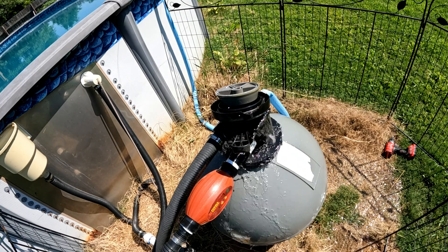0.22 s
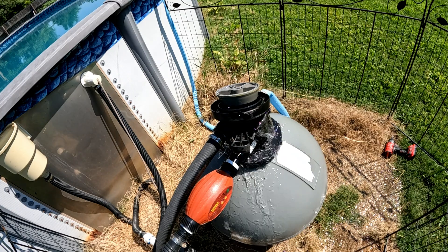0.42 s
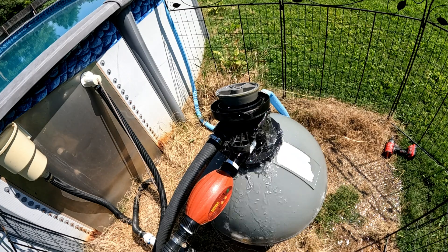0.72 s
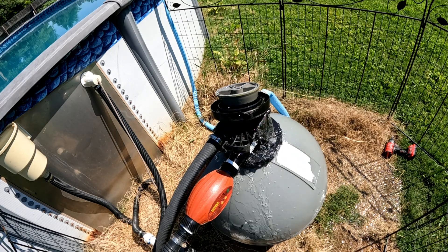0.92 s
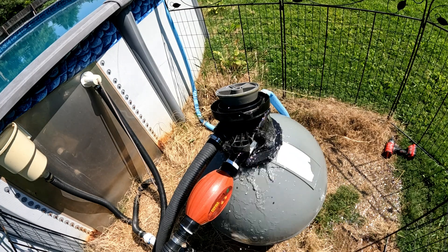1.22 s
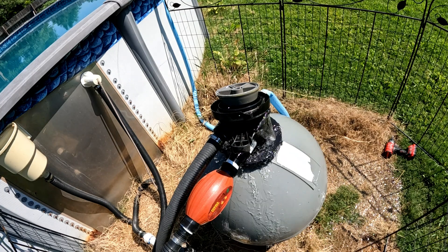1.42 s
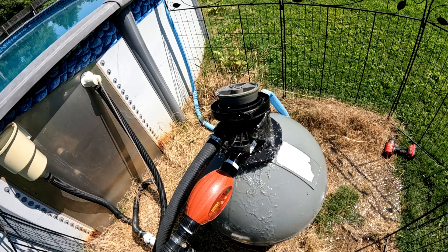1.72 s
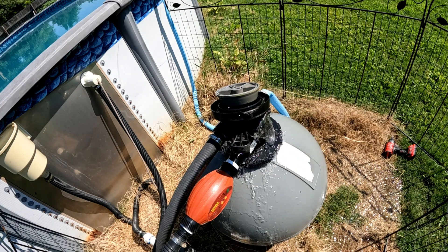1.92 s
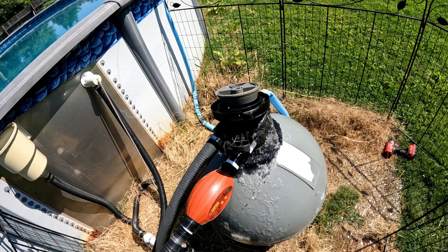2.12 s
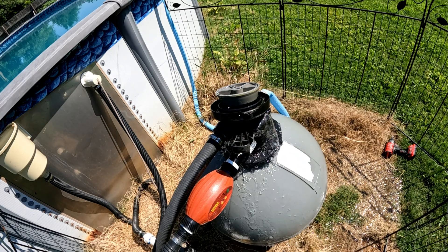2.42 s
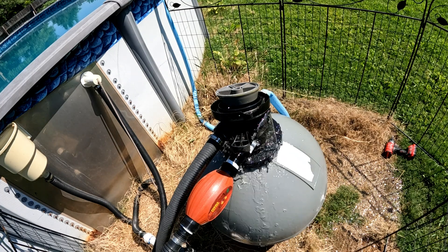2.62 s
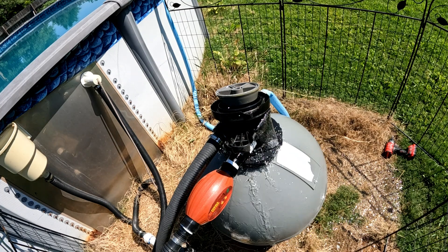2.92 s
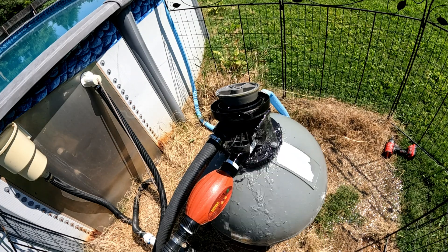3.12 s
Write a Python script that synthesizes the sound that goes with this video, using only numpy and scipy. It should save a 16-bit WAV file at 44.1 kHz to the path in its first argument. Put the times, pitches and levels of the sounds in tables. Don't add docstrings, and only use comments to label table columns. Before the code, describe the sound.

Water trickling and fizzing down a plastic tank outdoors, with plinking drops and two low wind gusts

```python
import sys
import numpy as np
from scipy import signal
from scipy.fft import rfft, irfft
from scipy.io import wavfile
from scipy.ndimage import uniform_filter1d

SR = 44100
rng = np.random.default_rng(int(sys.argv[2]) if len(sys.argv) > 2 else 0)


def unload_audio(sound):
    columns = np.transpose(np.atleast_2d(sound))
    steps = np.round(np.clip(columns, -1, 1) * 32767)
    wavfile.write(sys.argv[1], SR, steps.astype(np.int16))


def level_to_linear(level):
    exponent = np.asarray(level, float) / 20
    return 10 ** exponent


N = 143325

# [t/s, level/dB]
WATER_FLOW = [(0, -38), (.24, -38), (.42, -39.5), (.7, -37), (1.32, -39), (1.62, -39.5), (1.7, -37),
              (2.4, -39), (2.65, -40), (2.8, -34.5), (2.88, -38.5), (3.25, -38.5)]
# [f/Hz, level per Hz/dB]
WASH_COLOUR = [(150, -8.5), (300, -13.5), (670, -15), (1030, -3.5), (2880, 0), (6500, -9), (10400, -15),
               (15000, -25.5)]
# [f/Hz, level per Hz/dB]
TRICKLE_COLOUR = [(400, -38), (1020, -6.5), (1250, -2), (2500, -1), (4700, -7.5), (6800, -9), (10000, -18),
                  (15600, -41)]
# [t/s, level/dB]
GUST_LEVEL = [(0, -50.5), (.36, -39), (.46, -33), (.72, -30.5), (.8, -23.5), (1.02, -28.5), (1.07, -34),
              (1.3, -40), (1.5, -42.5), (1.63, -43.5), (1.85, -39.5), (2.0, -29), (2.4, -30), (2.65, -36.5),
              (2.8, -49), (3.25, -43)]
# [f/Hz, level per Hz/dB]
WIND_COLOUR = [(10, -2.5), (25, 5), (45, -3.5), (120, -19), (200, -29), (400, -52)]
# [t/s, peak level/dB, f/Hz]
WALL_SPATTERS = [(0.0313, -24, 1900), (0.2202, -22, 1370), (0.3406, -29.5, 1430), (0.377, -27, 2830),
                 (0.4945, -30.5, 930), (0.5763, -20.5, 1710), (0.6437, -25, 2760), (0.6721, -24.5, 930),
                 (0.911, -34, 2700), (1.0276, -23, 3470), (1.277, -34, 2790), (1.3274, -23, 4940),
                 (1.394, -22.5, 2440), (1.4262, -26, 1195), (1.4612, -25, 3130), (1.5821, -23.5, 1240),
                 (1.7072, -22.5, 4770), (1.8372, -25, 6100), (1.8538, -22, 2450), (2.0144, -25, 1730),
                 (2.1172, -19, 2130), (2.2837, -24, 2570), (2.358, -27, 4280), (2.3815, -24, 3960),
                 (2.4518, -29.5, 1190), (2.517, -23, 2200), (2.5306, -25, 2130), (2.6065, -25, 2400),
                 (2.676, -24, 2240), (2.699, -23.5, 2300), (2.7903, -17.5, 2380), (2.8153, -20.5, 1510),
                 (2.8856, -32, 2530), (3.1345, -27, 2890)]
# [t/s, peak level/dB]
SPRAY_TICKS = [(0.0797, -33), (0.1391, -41), (0.2773, -26), (0.376, -36), (0.445, -29), (0.5247, -36),
               (0.6933, -32), (0.9293, -41), (1.044, -39), (1.6676, -28), (1.748, -29), (1.7734, -40),
               (1.8018, -36), (2.0403, -39), (2.2179, -34), (2.2732, -34), (2.3156, -26), (2.4154, -25),
               (2.5476, -37), (2.7611, -37), (2.836, -33)]
# [t/s, peak level/dB, bubble f/Hz]
LARGE_DROPS = [(0.0828, -23.5, 3840), (0.1057, -22.5, 2670), (0.152, -25.5, 3200), (0.1948, -31, 1550),
               (0.221, -36, 1330), (0.2448, -18, 3870), (0.4542, -24.5, 2520), (0.7786, -20.5, 3060),
               (0.9336, -24, 2700), (0.963, -27, 2040), (1.0947, -22.5, 4600), (1.1178, -22.5, 4500),
               (1.3638, -31, 2240), (1.4148, -21.5, 2390), (1.5502, -23.5, 2216), (1.6663, -22.5, 2930),
               (1.68, -22, 1830), (1.753, -28, 2640), (1.785, -25.5, 2440), (1.9885, -27.5, 2160),
               (2.227, -28, 2210), (2.4165, -19, 2970), (2.7533, -22, 2840), (2.9143, -27, 3100),
               (2.9547, -25, 3260), (2.995, -26, 4230)]
# [t/s, peak level/dB, f/Hz, time to fall 60 dB/s, pitch rise/ratio]
DEEP_GURGLES = [
    (.212, -37, 690, 0.03, 0.58),
    (.309, -32, 657, 0.04, 0.24),
    (2.892, -38.5, 683, 0.14, 2.1),
    (3.087, -23, 1620, 0.024, 0.039),
    (3.177, -35.5, 1564, 0.089, 0.018),
    (3.225, -21, 1430, 0.023, .2),
]
# [t/s, peak level/dB, f/Hz]
BRIGHT_TICKS = [(0.2778, -26.5, 6600), (0.56, -22, 7680), (0.665, -26.5, 5130), (0.9502, -23.5, 6600),
                (1.668, -20.5, 6300), (1.9932, -20.5, 7330), (2.4162, -10.5, 5960), (2.7357, -16, 5700),
                (3.133, -24.5, 6050), (3.2096, -24, 7450)]
# [t/s, peak level/dB, f/Hz]
WIND_BUFFETS = [(0.457, -22, 57), (0.546, -23, 73), (0.61, -20, 88), (0.648, -20.5, 96),
                (0.678, -17.5, 91.5), (0.755, -18.5, 83), (0.791, -15.5, 60), (0.812, -18.5, 80),
                (0.83, -16, 100), (0.93, -16, 78.5), (0.977, -17.5, 57), (0.998, -13.5, 51),
                (2.014, -22.5, 65.6), (2.09, -17, 71), (2.16, -22, 118), (2.193, -19, 186),
                (2.237, -21.5, 124), (2.292, -17.5, 118), (2.337, -20, 139), (2.366, -19, 85),
                (2.39, -19.5, 112), (2.415, -14.5, 95)]
# [t/s, peak level/dB, f/Hz]
WIND_FLAPS = [(.664, -18.5, 204), (1.07, -32.5, 50), (1.15, -31.5, 55.6), (1.199, -33.5, 50),
              (1.259, -34, 45), (1.429, -31, 45), (1.478, -33, 45), (1.531, -33, 45), (1.989, -21, 49.4),
              (2.071, -22, 70), (2.446, -25.5, 70), (2.52, -30, 45), (2.63, -27.5, 59.7)]
# [t/s, length/s, level/dB]
AIR_RUSHES = [
    (0.484, 0.29, -47),
    (1.097, 0.095, -56.5),
    (2.15, 0.12, -44),
    (2.678, 0.4, -54),
]
# [t/s, length/s, peak level/dB, start f/Hz, end f/Hz]
GASKET_SQUEAKS = [
    (0.504, 0.042, -32, 972, 943),
    (0.539, 0.038, -40, 945, 798),
    (0.577, 0.029, -33, 881, 900),
    (0.683, 0.024, -22, 811, 946),
]
# [t/s, length/s, peak level/dB, f/Hz]
HOSE_GROANS = [
    (1.12, 0.11, -48.5, 200),
    (2.456, 0.165, -48, 200),
]
# [f/Hz, phase/rad]
PORT_LEAD = [(200, -0.17), (3400, -0.57), (6000, -0.38), (8400, -0.76), (11000, 0.11)]
# [f/Hz, level/dB]
PORT_TILT = [(400, 0), (2400, -1), (8000, 1), (15000, 4)]
# [f/Hz, likeness/0 to 1]
PORT_LIKENESS = [(300, 0.86), (700, 0.87), (1400, 0.96), (6800, 0.89), (10000, 0.89), (13000, 0.45)]


def evened(x):
    return x / np.sqrt(np.mean(x ** 2) + 1e-20)


def read(points, hz):
    f, value = np.transpose(points)
    return np.interp(np.log(hz + 1), np.log(f + 1), value)


def curve(table, t):
    times, levels = np.transpose(table)
    return np.interp(t, times, levels)


def add(mix, s, sound):
    part = mix[max(round(s * SR), 0):][:len(sound)]
    part += sound[:len(part)]


def drift(size, count):
    smooth = uniform_filter1d(rng.standard_normal(size), count)
    return evened(uniform_filter1d(smooth, count))


def shaped(x, gain):
    size = 2 ** 18
    return irfft(rfft(x, size) * gain(np.fft.rfftfreq(size, 1 / SR)))[..., :N]


def bubble(hz, t60, glide, rise_s):
    t = np.arange(0, max(t60, .002), 1 / SR)
    level = (1 - np.exp(-t / rise_s)) ** 2 * level_to_linear(-60 * t / t60)
    return level * np.sin(2 * np.pi * hz * t * (1 + glide * (t / t60) ** 1.57))


def splash(hz, t60):
    t = np.arange(2048) / SR
    b, a = signal.butter(2, [hz * .75, min(hz * 1.4, 18000)], "band", fs=SR)
    noise = evened(signal.lfilter(b, a, rng.standard_normal(2048)))
    return noise * level_to_linear(-60 * t / t60) * np.minimum(t / 0.0004, 1)


def wash():
    frames = N // 64 + 5
    *z, patches = rng.standard_normal((frames, 129, 5)).T
    patches = uniform_filter1d(patches, size=4, axis=0)
    patches = evened(uniform_filter1d(patches, size=20, axis=1))
    z = np.array(z[:2]) + 1j * np.array(z[2:])
    z = z * level_to_linear(3 * patches + 2 * drift(frames, count=10))
    noise = signal.istft(z, nperseg=256, noverlap=192)[1][:, :N]
    return evened(shaped(noise, lambda f: level_to_linear(read(WASH_COLOUR, f))))


def fizz():
    per_s, clump, spread_db, cycles = 2400, .7, 4.5, 13.9
    wander = np.array([drift(N, count=450), drift(N, count=250)])
    rate = per_s * np.exp(clump * wander - clump ** 2 / 2)
    size = level_to_linear(spread_db * np.minimum(rng.exponential(1, N), 3)) * rng.choice([-1, 1], N)
    kind, out = rng.integers(0, 48, N), np.zeros((2, N))
    size = size * (rng.random(N) < np.where(kind < 32, *rate) / SR)
    size = np.array([size, size * rng.standard_normal(N)])
    for k, hz in enumerate(np.geomspace(600, 15000, 48)):
        t60 = cycles * 2 * rng.uniform(0.75, 1.49) / hz * min(1, np.sqrt(4000 / hz))
        grain = bubble(hz, t60, glide=.14, rise_s=2 / hz)
        grain = grain / np.linalg.norm(grain) * np.sqrt(hz) * level_to_linear(read(TRICKLE_COLOUR, hz))
        out += signal.oaconvolve(size * (kind == k), grain[None], axes=1)[:, :N]
    return evened(out)


def snap(t60=0.0047):
    t = np.arange(512) / SR
    colour = level_to_linear(read(WASH_COLOUR, np.fft.rfftfreq(512, 1 / SR)))
    return evened(irfft(rfft(rng.standard_normal(512)) * colour)) * level_to_linear(-60 * t / t60)


def snaps():
    per_s, spread_db = 150, 3
    size = level_to_linear(spread_db * np.minimum(rng.exponential(1, N), 3)) * (rng.random(N) < per_s / SR)
    size = np.array([size, size * rng.standard_normal(N)])
    kind, out = rng.integers(0, 8, N), np.zeros((2, N))
    for k in range(8):
        out += signal.oaconvolve(size * (kind == k), snap()[None], axes=1)[:, :N]
    return evened(out)


def wind():
    same, reach_db_per_oct, calm_db, lump_db, pan_db = 0.88, 0.1922, -41.5, 3.5, -4.5
    frames, hz = N // 512 + 5, np.fft.rfftfreq(2048, 1 / SR)[:, None]
    t = np.arange(frames) * 512 / SR
    a, b, c, d = rng.standard_normal((frames, 1025, 4)).T
    right = a + 1j * b
    left = same * right + np.sqrt(1 - same ** 2) * (c + 1j * d)
    octave = np.clip(np.log2((hz + 1) / 50), 0, 3)
    reach = reach_db_per_oct * octave * (curve(GUST_LEVEL, t) - calm_db)
    z = np.array([left, right]) * level_to_linear(read(WIND_COLOUR, hz) - 90 * (hz > 500) + reach)
    x = evened(signal.istft(z, nperseg=2048, noverlap=1536)[1][:, :N])
    x = x * level_to_linear(curve(GUST_LEVEL, np.arange(N) / SR) + lump_db * drift(N, count=900))
    return x * level_to_linear(pan_db * np.array([[.5], [-.5]]))


def hum():
    noise = rng.standard_normal((2, N))
    return level_to_linear(-61.5) * evened(shaped(noise, lambda f: 1 / (1 + ((f - 118) / 10) ** 2)))


def spatters():
    out = np.zeros((2, N))
    for s, db, hz in WALL_SPATTERS:
        add(out[0], s, level_to_linear(db - 6) * bubble(hz, t60=38 / hz, glide=.12, rise_s=0.00066))
        for row in out:
            add(row, s, level_to_linear(db - 10.5) * splash(hz, t60=0.023))
            add(row, s, level_to_linear(db - 10.5) * snap())
    return out


def sprays():
    out = np.zeros((2, N))
    for s, db in SPRAY_TICKS:
        for row in out:
            add(row, s, level_to_linear(db - 2) * splash(10700, t60=0.0074))
    return out


def drops():
    out = np.zeros((2, N))
    for s, db, hz in LARGE_DROPS:
        add(out[0], s - .001, level_to_linear(db) * 2 * bubble(hz, t60=42.7 / hz, glide=.12, rise_s=0.00073))
        for row in out:
            add(row, s, level_to_linear(db - 11) * splash(hz, t60=0.056))
    return out


def gurgles():
    out = np.zeros((2, N))
    for s, db, hz, t60, glide in DEEP_GURGLES:
        add(out[0], s, level_to_linear(db) * 2 * bubble(hz, t60, glide, rise_s=0.0035))
    return out


def ticks():
    out = np.zeros((2, N))
    for s, db, hz in BRIGHT_TICKS:
        add(out[0], s, level_to_linear(db) * 2.43 * bubble(hz, t60=0.0037, glide=0, rise_s=0.00027))
        for row in out:
            add(row, s, level_to_linear(db - 8) * splash(hz, t60=0.0074))
    return out


def buffets():
    cycles, level_db, pan_db = 0.6, 1.5, -7
    lumps, u = np.zeros(N), np.arange(-3000, 3000) / SR
    for s, db, hz in list(WIND_BUFFETS) + list(WIND_FLAPS):
        swell = np.exp(-abs(u * hz / cycles) ** 1.3 * 2)
        wave = np.sin(2 * np.pi * (hz * u + rng.random()))
        add(lumps, s - 3000 / SR, level_to_linear(db + level_db) * swell * wave)
    return lumps * level_to_linear(pan_db * np.array([[.5], [-.5]]))


def rustle():
    lo_hz, hi_hz = 200, 560
    level = np.zeros(N)
    for s, length, db in AIR_RUSHES:
        arch = np.sin(np.linspace(0, np.pi, round(length * SR)))
        add(level, s, level_to_linear(db) * np.sqrt(arch + 1e-9))
    band = lambda f: 1 / (1 + (lo_hz / (f + 1)) ** 4) / (1 + (f / hi_hz) ** 3)
    noise = evened(shaped(rng.standard_normal((2, N)), band))
    return level * level_to_linear(2.5 * drift(N, count=300)) * noise


def reedy(length, start_hz, end_hz, overtone):
    u = np.arange(0, 1, 1 / SR / length)
    wobble = 1 + 0.034 * drift(8000, count=80)[:len(u)]
    turn = 2 * np.pi * np.cumsum((start_hz + (end_hz - start_hz) * u) * wobble) / SR
    tone = np.sin(turn) + overtone * np.sin(2 * turn + 1)
    tone = tone + level_to_linear(-15.5) * (np.sin(3 * turn + 2) + np.sin(4 * turn))
    return np.sin(np.pi * u) ** 1.6 * tone


def squeaks():
    out = np.zeros(N)
    for s, length, db, start_hz, end_hz in GASKET_SQUEAKS:
        add(out, s, level_to_linear(db) * reedy(length, start_hz, end_hz, overtone=level_to_linear(-3.5)))
    return out


def knock():
    out, width_s = np.zeros(N), 0.00035
    u = np.arange(-200, 200) / SR / width_s
    add(out, .8035 - 200 / SR, -level_to_linear(-13) * (1 - u ** 2 / 2) * np.exp(-u ** 2 / 2))
    return out


def groans():
    out = np.zeros(N)
    for s, length, db, hz in HOSE_GROANS:
        add(out, s, level_to_linear(db) * reedy(length, hz, hz, overtone=0))
    return out


def ports(x):
    yard_db, yard_t60, scatter = -14.5, 0.038, 0.71
    t = np.arange(4000) / SR
    tail = rng.standard_normal(4000) * level_to_linear(-60 * t / yard_t60) * (t > .0012)
    tail = tail[None] / np.linalg.norm(tail)
    mid, other = x + level_to_linear(yard_db) * signal.oaconvolve(x, tail, axes=1)[:, :N]
    same = lambda f: np.clip(read(PORT_LIKENESS, f), 0, 1)
    sides = []
    for k in (.5, -.5):
        tilt = lambda f: level_to_linear(k * read(PORT_TILT, f))
        shared = lambda f: tilt(f) * np.sqrt(same(f)) * np.exp(1j * k * read(PORT_LEAD, f))
        differing = lambda f: tilt(f) * 2 * k * scatter * np.sqrt(1 - same(f))
        sides.append(shaped(mid, shared) + shaped(other, differing))
    return np.array(sides)


def scene():
    flow = level_to_linear(curve(WATER_FLOW, np.arange(N) / SR))
    water = flow * (level_to_linear(-5.5) * wash() + level_to_linear(-3.5) * fizz() + level_to_linear(-13) * snaps())
    water = water + spatters() + sprays() + drops() + gurgles() + ticks()
    valve = (squeaks() + knock() + groans()) * np.array([[1], [0]])
    return ports(water + hum() + rustle() + valve) + wind() + buffets()


def low_pass(x):
    return signal.sosfilt(signal.butter(12, 15800, fs=SR, output="sos"), x)


def record(dry):
    notch = lambda f: level_to_linear(-6 * np.exp(-((f - 8640) / 700) ** 2))
    edges = lambda f: 1 / (1 + (f / 14100) ** 30) * f ** 2 / (f ** 2 + 10 ** 2)
    return low_pass(shaped(dry, lambda f: notch(f) * edges(f)))


dry = scene()
out = record(dry)
unload_audio(out)
```